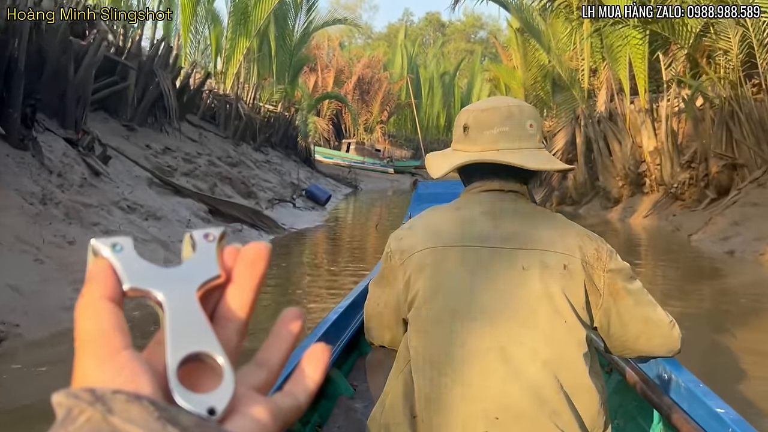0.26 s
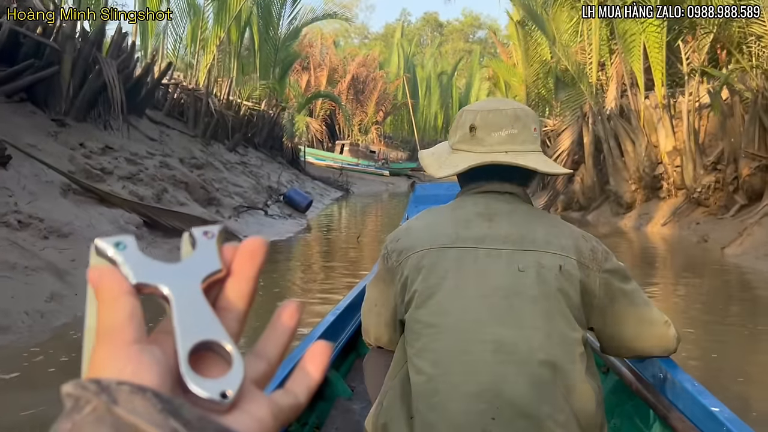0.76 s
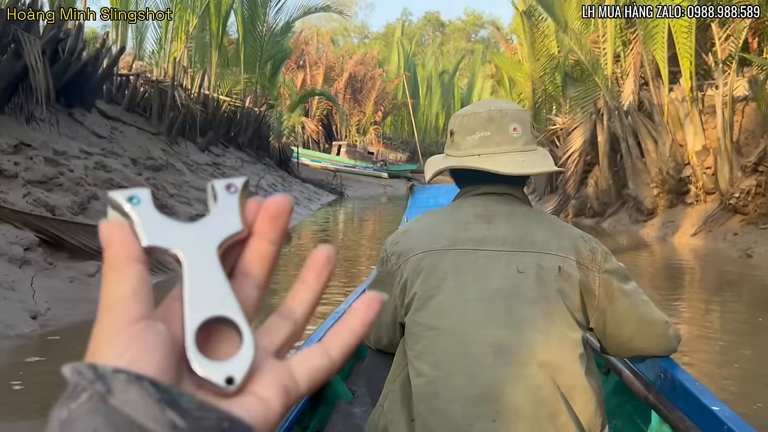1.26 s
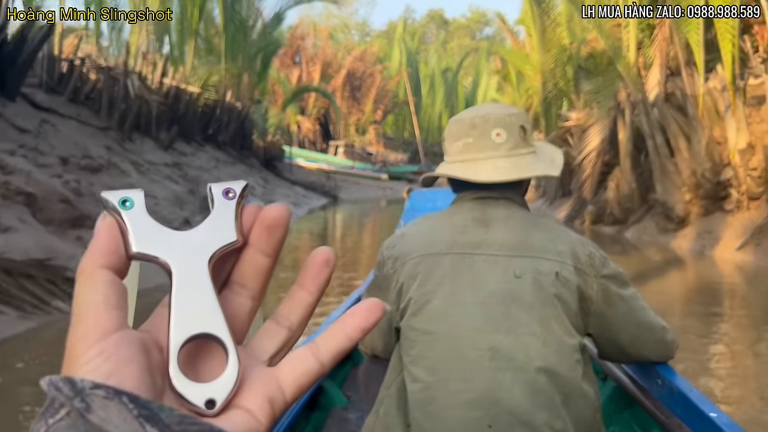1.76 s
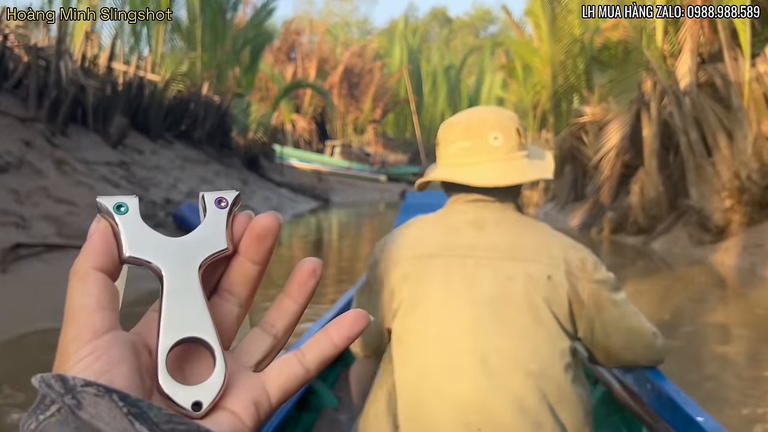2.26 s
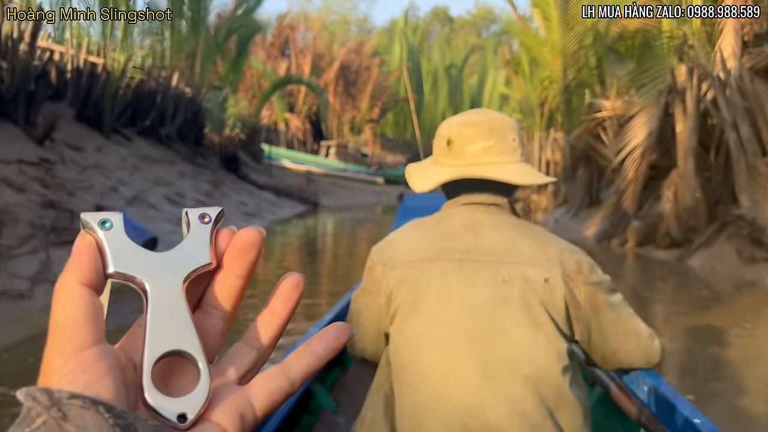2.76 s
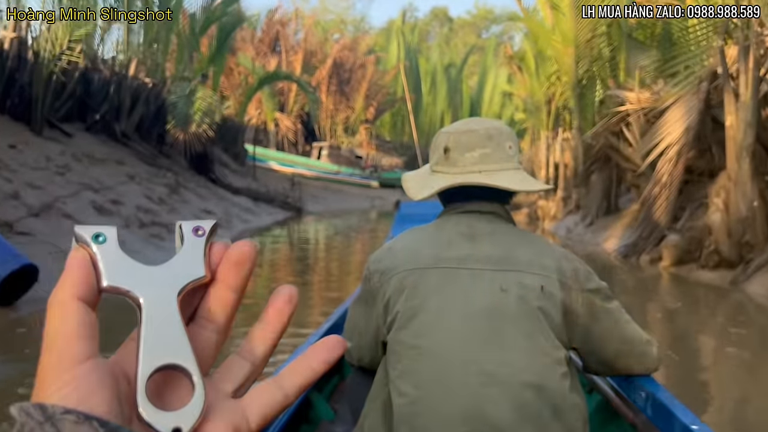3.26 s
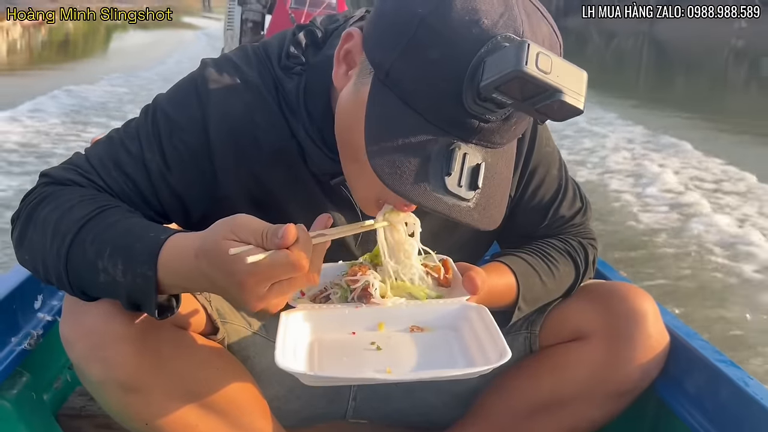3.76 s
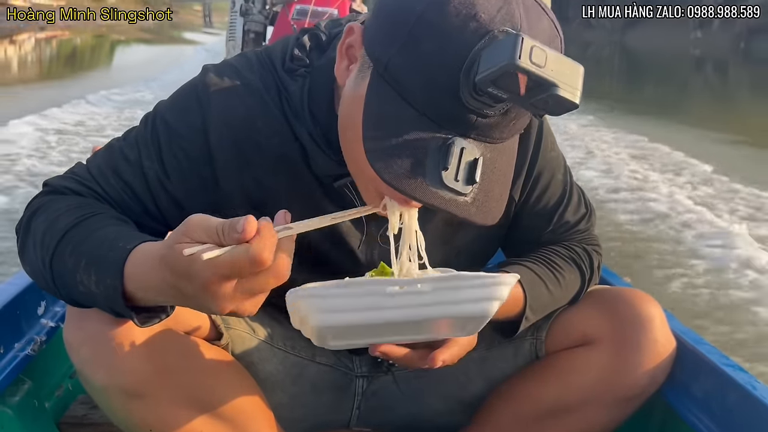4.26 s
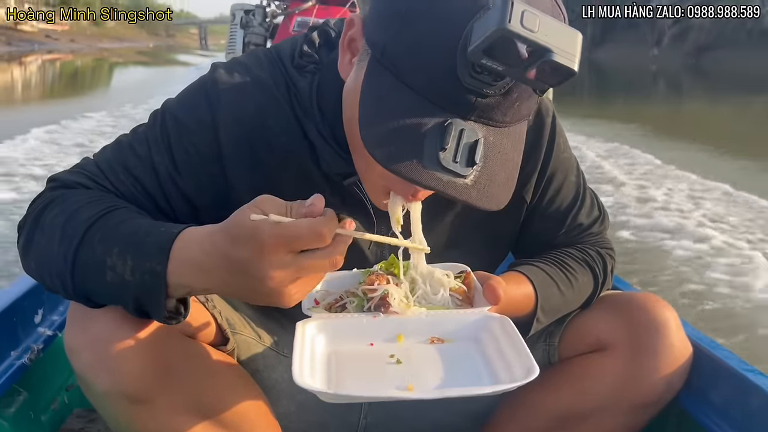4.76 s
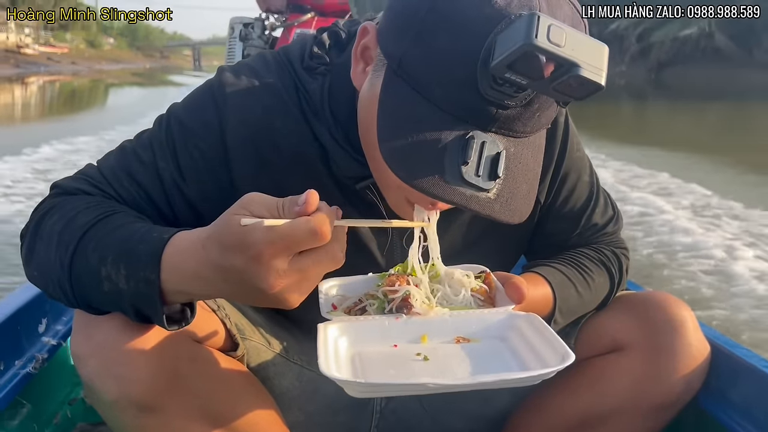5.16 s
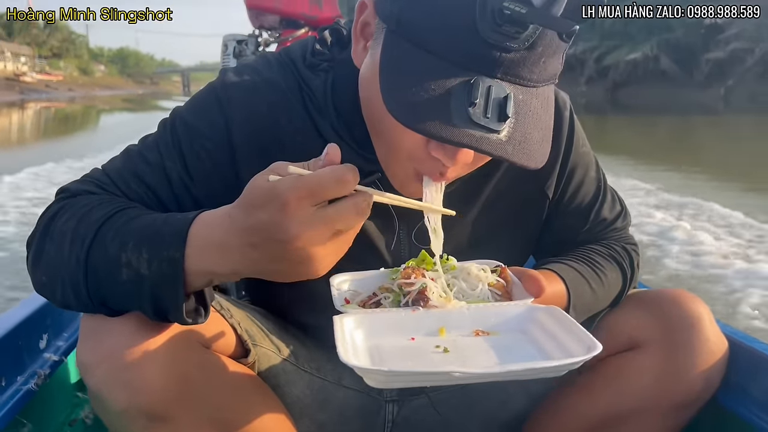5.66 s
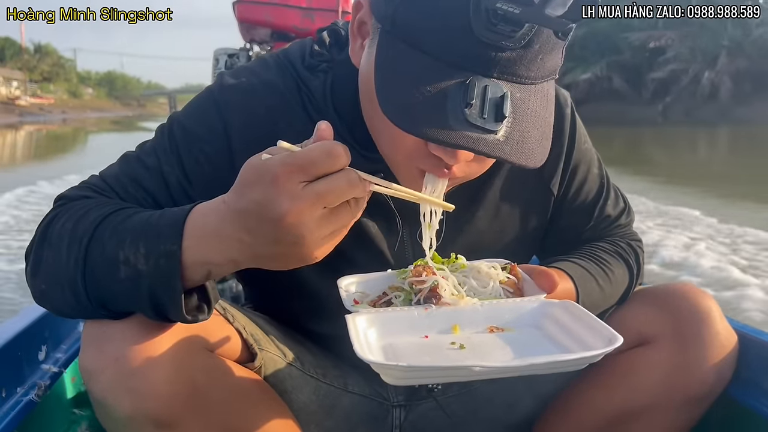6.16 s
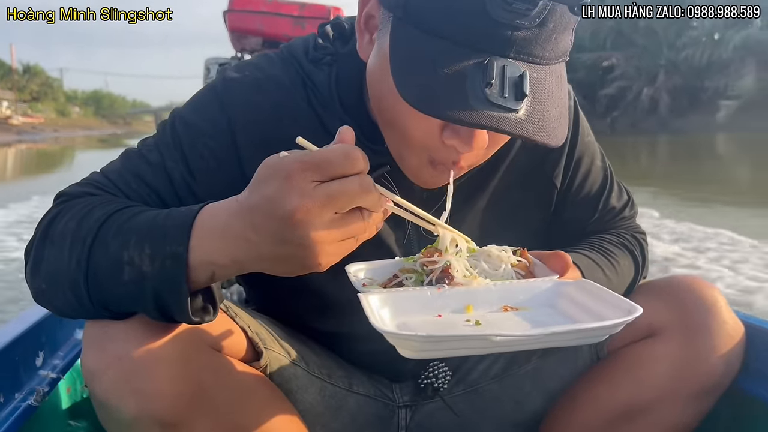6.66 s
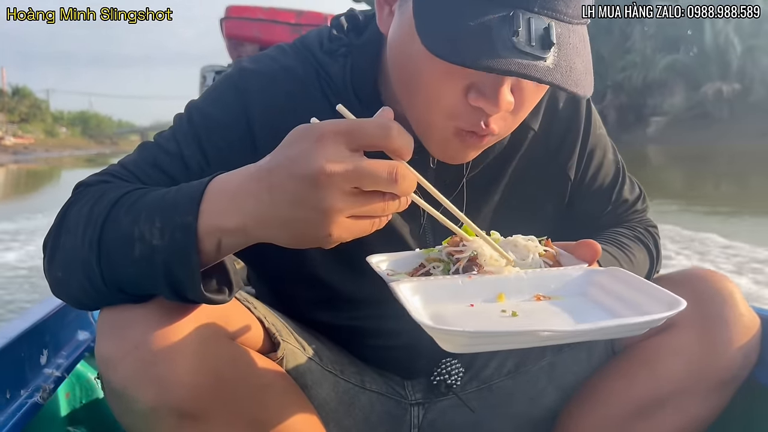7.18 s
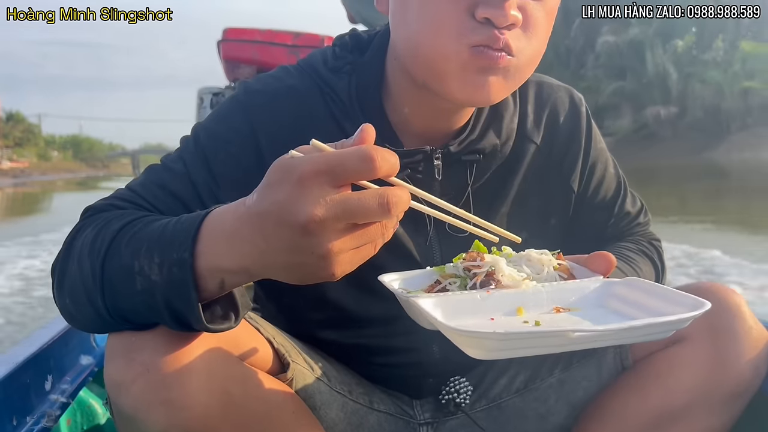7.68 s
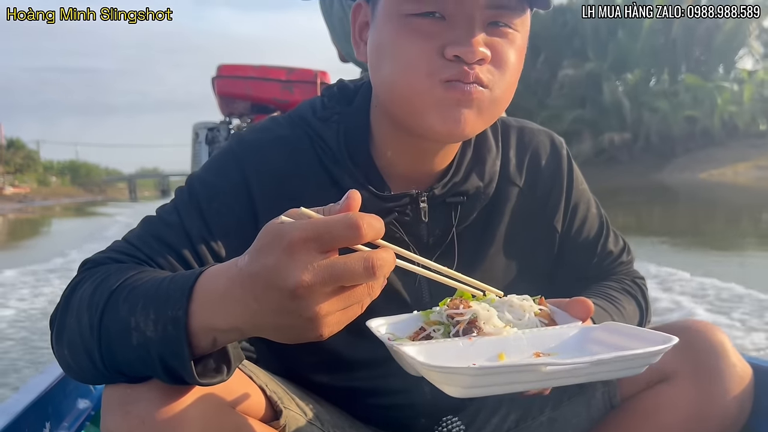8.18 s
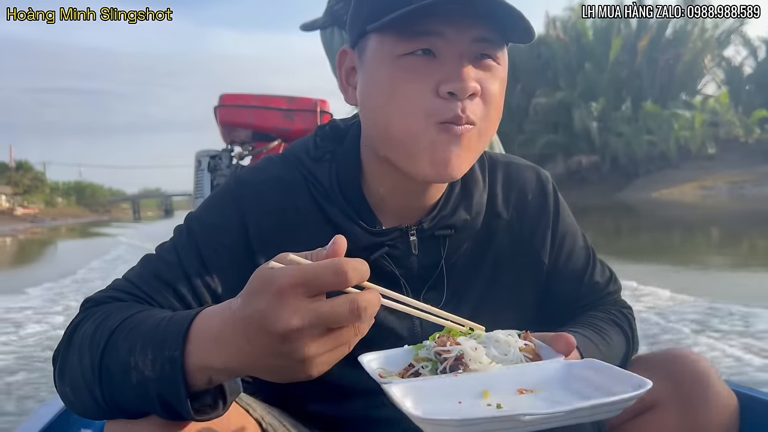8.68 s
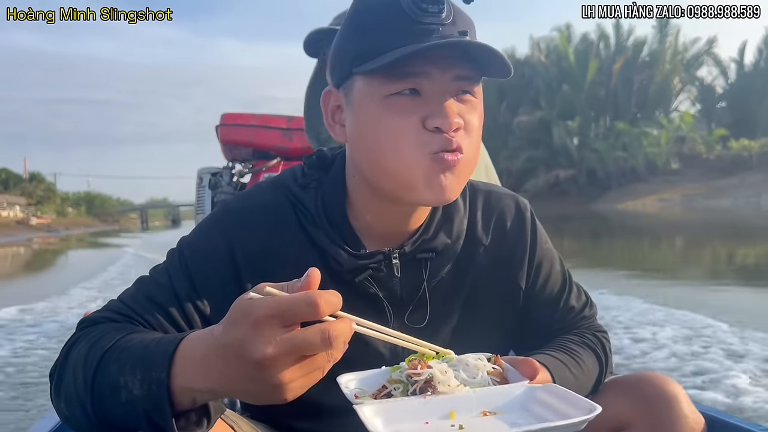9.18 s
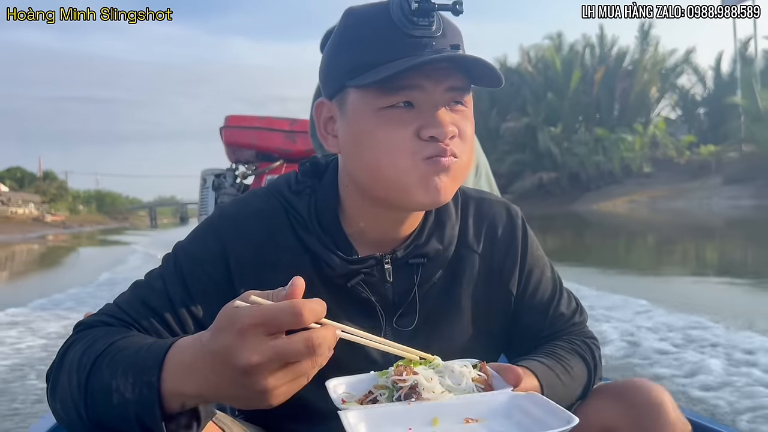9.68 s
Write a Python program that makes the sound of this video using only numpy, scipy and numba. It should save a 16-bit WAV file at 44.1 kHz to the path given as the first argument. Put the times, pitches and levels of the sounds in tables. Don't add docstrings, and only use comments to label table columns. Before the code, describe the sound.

Rapid, low motor firings blur into a throbbing drone in a narrow creek, the tone swelling and hollowing with echoes, with breathy exhaust puffs and soft hull wash. An abrupt change moves to open river: the engine is a little higher in pitch, even and buzzy, with more metallic rattle and fuller water noise. A faint brighter spray passes near the end. Close phone microphone aboard, no speech.

```python
import sys
import numpy as np
from scipy import signal
from scipy.fft import rfft, irfft, next_fast_len
from scipy.io import wavfile
from scipy.ndimage import uniform_filter1d
from numba import njit

SR = 44100
rng = np.random.default_rng(int(sys.argv[2]) if len(sys.argv) > 2 else 0)


def to_linear_factor(level_db):
    exponent = np.asarray(level_db, float) / 20
    return 10 ** exponent


def materialize(psi):
    bounded = np.clip(np.atleast_2d(psi).T, -1, 1)
    quanta = np.round(bounded * 32767).astype(np.int16)
    wavfile.write(sys.argv[1], SR, quanta)


N = 437913
CUT_S = 3.468
HOP = 128


def on_log(hz, table, column=1):
    rows = np.array(table, float)
    return np.interp(np.log(np.maximum(hz, 1)), np.log(rows[:, 0]), rows[:, column])


def columns(table, t):
    s, *rest = np.transpose(table)
    return [np.interp(t, s, c) for c in rest]


def bump(x, centre, width):
    return np.exp(-((x - centre) / width) ** 2)


def walk(rate_hz, count, frames):
    k = max(int(SR / HOP / rate_hz), 1)
    draws = rng.standard_normal((count, frames // 4 + 2))[:, :frames // k + 1]
    held = np.repeat(draws, k, axis=1)
    return 1.45 * uniform_filter1d(held, k, axis=1)[:, :frames]


def shading(hz, shade, turn):
    full_turn_db = sum(change_db * bump(np.log2(hz / centre_hz), 0, octaves)
                       for centre_hz, octaves, change_db in shade)
    return (turn - .5) * full_turn_db


def port_gains(hz, ports):
    half = np.exp(.5j * on_log(hz, ports, column=2)) * to_linear_factor(on_log(hz, ports, column=3) / 2)
    return np.array([half, 1 / half]) / np.maximum(np.abs(half + 1 / half) / 2, .5)


@njit
def stack(turns, size, ears, hop):
    out = np.zeros((2, len(turns)))
    for i in range(len(turns)):
        j, a = i // hop, (i % hop) / hop
        step = np.exp(2j * np.pi * turns[i])
        z = step
        for k in range(size.shape[0]):
            v = z * ((1 - a) * size[k, j] + a * size[k, j + 1])
            out[0, i] += (v * ears[0, k]).real
            out[1, i] += (v * ears[1, k]).real
            z *= step
    return out


def pulse_phase(shape_db, order, spread_rad, clatter_lead_cycles, clatter_smear_rad,
                boom_lag_cycles, bark_lead_cycles):
    log_gain = np.log(to_linear_factor(np.r_[shape_db[0] - 20, shape_db, shape_db[-1] - np.arange(60)]))
    cepstrum = irfft(log_gain)
    cepstrum[1:len(cepstrum) // 2] *= 2
    cepstrum[len(cepstrum) // 2 + 1:] = 0
    phase = rfft(cepstrum).imag[order] + np.pi - spread_rad * np.sqrt(order)
    smear = clatter_smear_rad * rng.standard_normal(len(order))
    phase += (order > 11) * order * (2 * np.pi * clatter_lead_cycles + smear)
    bark = (order >= 8) * (order <= 14)
    boom = order <= 3
    return phase + 2 * np.pi * order * (bark_lead_cycles * bark - boom_lag_cycles * boom)


def exhaust(t, turns, speed, control, turning, banks, orders, casing, cover, ports, shade,
            swell_db, rough, top_hz, body_db, swell_rate_hz, uneven_db, **pulse):
    s = t[0] + np.arange(len(t) // HOP + 2) * HOP / SR
    hz, turn = columns(speed, s)[0], columns(control, s)[1]
    order = np.arange(1, int(top_hz / hz.mean()) + 1)
    shape_db = on_log(order * hz.mean(), casing) + uneven_db * rng.standard_normal(len(order))
    shape_db[:len(orders)] = np.array(orders)[:, 1]
    phase = pulse_phase(shape_db, order, **pulse)

    drift = walk(swell_rate_hz, len(order), len(hz))
    drift[:9] *= .2
    db = shape_db[:, None] + np.linspace(*body_db, len(hz)) + swell_db * np.minimum(drift, drift / 2)
    line_hz = order[:, None] * hz
    for panel_hz, width_hz, lift_db in cover:
        db += lift_db / (1 + ((line_hz - panel_hz) / width_hz) ** 2)
    for at_s, half_s, echo_hz, echo_db in banks:
        db += echo_db * bump(s, at_s, half_s) * bump(line_hz, echo_hz, 14)
    db += shading(line_hz, shade, turn)
    for k, lift_db, turn_db in turning:
        db[round(k) - 1] += lift_db + turn_db * (turn - .5)

    wobble = walk(hz.mean(), 2 * len(order), len(hz))
    roughness = rough * np.sqrt(order)[:, None] * (wobble[::2] + 1j * wobble[1::2])
    phase_drift = swell_db * 0.15 * walk(swell_rate_hz, len(order), len(hz))
    size = np.sqrt(2) * to_linear_factor(db) * (1 + roughness) * np.exp(1j * (phase[:, None] + phase_drift))
    return stack(turns, size, port_gains(order * hz.mean(), ports), HOP)


def noise_bands(count, spectrum, ports, per_octave):
    size = next_fast_len(count)
    hz = np.arange(size // 2 + 1) * SR / size
    low_hz, high_hz = spectrum[0][0], spectrum[-1][0]
    both, left, right = (rfft(rng.standard_normal(size)) for _ in range(3))
    share = np.clip(on_log(hz, ports), 0, 1)
    mixed = np.sqrt(share) * both + np.sqrt(1 - share) * np.array([left, right])
    pair = port_gains(hz, ports) * mixed
    pair *= to_linear_factor(on_log(hz, spectrum)) * (hz > low_hz) * (hz < high_hz)
    pair /= np.sqrt(2 * np.sum(np.abs(pair.mean(axis=0)) ** 2)) / size
    place = per_octave * np.log2(np.maximum(hz, 1) / low_hz)
    for k in range(int(per_octave * np.log2(high_hz / low_hz)) + 2):
        band = pair * np.clip(1 - np.abs(place - k), 0, 1)
        yield low_hz * 2 ** (k / per_octave), irfft(band, size)[:, :count]


def gas(t, turns, level_db, ring_db, bright_db, hiss, ports, scatter_db, colour_db, ring_hz,
        lag_cycles, puff_db, lead_db, swell_db, shade, turn):
    frame = np.arange(len(t)) // HOP
    level_db, ring_db, bright_db = level_db[::HOP], ring_db[::HOP], bright_db[::HOP]
    cycle = turns - lag_cycles
    gate = np.exp(2.6 * (np.cos(2 * np.pi * cycle) - 1))
    intake = np.exp(7.1 * (np.cos(2 * np.pi * (cycle + 0.37)) - 1))
    floor = 1 + to_linear_factor(2 * lead_db) * intake
    firing = np.floor(cycle + .5).astype(int) + 2
    strength_db = scatter_db * rng.standard_normal(400)
    out = 0
    for hz, band in noise_bands(len(t), hiss, ports, per_octave=8.12):
        tint_db = colour_db * np.clip(rng.standard_normal(400), -3, 1.5)
        puff = to_linear_factor(2 * (puff_db * min(hz / 6000, 1) + strength_db + tint_db))
        puffs = puff[firing] * gate
        power = floor + puffs
        slow_db = level_db + swell_db * walk(3.28, 1, len(level_db))[0] + bright_db * np.log2(hz / 5000)
        ring = ring_db * np.exp(-(np.log(hz / ring_hz) * 14) ** 2)
        slow_db += 0.76 * ring + shading(hz, shade, turn[::HOP])
        rung = floor + puffs * to_linear_factor(3.0 * ring)[frame]
        out = out + band * (np.sqrt(rung / power.mean()) * to_linear_factor(slow_db)[frame])
    return out


def wash(t, turns, level_db, spectrum, ports, lag_cycles, throb_db, flicker_db, shade, turn):
    out, frame = 0, np.arange(len(t)) // HOP
    knock = np.exp(2.1 * (np.cos(2 * np.pi * (turns - lag_cycles)) - 1))
    for hz, band in noise_bands(len(t), spectrum, ports, per_octave=3.15):
        flicker = walk(2.47, 1, frame[-1] + 1)[0, frame]
        band_db = flicker_db * flicker + throb_db * min(hz / 1000, 1) * knock + shading(hz, shade, turn)
        out = out + band * to_linear_factor(band_db)
    return out * to_linear_factor(level_db)


def creek(t):
    # [t/s, firing rate/Hz]
    speed = [
        (0, 32.52),
        (.4, 32.04),
        (.8, 31.3),
        (1.3, 30.78),
        (1.6, 30.7),
        (2.1, 32.43),
        (2.7, 33.32),
        (3.47, 33.9),
    ]
    # [t/s, gas and water level/dB, throttle opening 0-1 (passed on as turn)]
    control = [(0, 2, 0), (.6, 0.5, 0), (1.1, 0.5, 0.16), (1.55, 0.5, 0.45), (1.9, 1.5, 0.6), (2.3, 1.5, 0.85),
               (2.6, 2, 0.93), (3, 1, 1), (3.47, 2.5, 0.77)]
    # [order, lift/dB, change over whole throttle opening/dB]
    turning = [(3, 0, 4.5), (5, 2, -0.5), (6, -10, 6), (9, -1, 10)]
    # [t/s, half length/s, f/Hz, level/dB]
    banks = [(0.298, 0.086, 161, 2), (.75, .12, 470, 1), (.85, .12, 101, -8), (.87, 0.099, 281, -13),
             (1.1, 0.37, 315, 6.5), (1.196, 0.085, 185, -18), (1.3, 0.22, 520, -16), (1.7, 0.16, 369, 11),
             (2.9, 0.22, 134, -14), (2.92, .12, 100, -8), (.55, 0.28, 380, -10), (2.25, .15, 396, -12),
             (.4, .4, 547, 5), (2.99, 0.055, 168, -6), (3, 0.27, 502, -12)]
    # [multiple of firing rate, level/dB]
    orders = [(1, -27), (2, 0), (3, -11), (4, -2), (5, -7), (6, -13), (7, -21), (8, -17), (9, -14),
              (10, -22), (11, -24), (12, -24), (13, -28), (14, -28), (15, -23), (16, -31), (17, -26),
              (18, -30)]
    # [f/Hz, level/dB]
    casing = [(500, -32), (700, -37), (870, -32), (1150, -35), (1300, -40), (1500, -43)]
    # [f/Hz, width/Hz, level/dB]
    cover = [
        (156.6, 1.34, -26.5),
        (184.8, 4.9, 18.5),
        (1044.5, 12.3, 10),
    ]
    # [f/Hz, level/dB per Hz]
    hiss = [(1410, 5.5), (2400, -0.5), (2980, 1), (4730, -1), (6060, 2), (7400, -9.5), (8620, -1),
            (10200, -19.5), (11400, -13), (12500, -17), (13700, -33), (14500, -25), (16200, -21)]
    # [f/Hz, level/dB per Hz]
    water = [(20, -30), (40, -21), (70, -8), (145, -11), (215, -14.5), (290, -12.5), (380, -23.5),
             (480, -20), (650, -26), (1040, -24.5), (1450, -33), (2050, -26.5), (2800, -35.5), (3600, -58)]
    # [f/Hz, shared share 0-1, left lead/rad, left minus right/dB]
    ports = [(60, .98, -.1, -.7), (200, .8, -.2, -1.8), (350, .6, -.6, -3), (500, .3, -1.6, -3.5),
             (650, .4, 2.2, -4), (900, .45, 1.8, -4), (1500, .4, 2.2, -3), (2400, .3, 1.1, -2),
             (3400, .35, .5, -2), (5500, .25, 0, 2), (7200, .3, 2, -1), (8300, .4, 0, -4),
             (9400, .6, -1.6, -2), (10300, .95, -3.14, 0), (11900, .97, -6.28, 0), (13700, .97, -9.42, 0),
             (15300, .97, -12.57, 0)]
    # [f/Hz, width/octaves, change over whole throttle opening/dB]
    shade = [(600, 0.72, 1), (2300, .3, 2.5), (8200, 0.16, 2)]

    turns = np.cumsum(columns(speed, t)[0]) / SR - .04
    near_db, turn = columns(control, t)
    pipe = exhaust(t, turns - .38, speed, control, turning, banks, orders, casing, cover, ports, shade,
                   swell_db=5, rough=.03, top_hz=1500, body_db=(-16.5, -15), swell_rate_hz=4,
                   uneven_db=-3.0, spread_rad=0.17, clatter_lead_cycles=.55, clatter_smear_rad=.12,
                   boom_lag_cycles=0, bark_lead_cycles=0)
    puffs = gas(t, turns, near_db - 29.0, 7 * turn ** 2, 4.8 + 0 * t, hiss, ports,
                scatter_db=2, colour_db=6.5, ring_hz=4300, lag_cycles=0.045, puff_db=-5.5,
                lead_db=0, swell_db=-1.15, shade=shade, turn=turn)
    return pipe + puffs + wash(t, turns, near_db - 28.0, water, ports, lag_cycles=-.2, throb_db=-1.5,
                               flicker_db=2.0, shade=shade, turn=turn)


def river(t):
    # [t/s, firing rate/Hz]
    speed = [(3.47, 36.616), (4.3, 36.54), (4.9, 36.616), (5.6, 36.579), (6.4, 36.548), (6.9, 36.583),
             (7.7, 36.351), (8.4, 36.522), (9.1, 36.473), (9.93, 36.601)]
    # [t/s, nearness of gas and water level/dB, turn 0-1]
    control = [(3.47, 0.83, 0.056), (4.4, 0.67, 0.089), (5.2, 0.52, 0.29), (6, 0.082, 0.5), (6.8, 0.7, 0.58),
               (7.5, 0.48, 0.71), (8.2, 0.56, 0.51), (8.8, 0.87, 0.57), (9.93, -0.17, 0.56)]
    # [order, lift/dB, change over whole turn/dB]
    turning = [(5, 1, 6.5), (6, 0.5, 4.5), (7, 0.5, 4.5), (9, -3.5, 11), (10, -2.5, -12.5),
               (11, -0.5, -4.5), (12, 1, 4), (14, -2, -10), (34, 14, 8), (45, 1.5, -11), (48, 7.5, -11),
               (49, -8, -4), (53, -4, 7), (57, 1, -11), (60, -9, -14)]
    # [t/s, half length/s, f/Hz, level/dB]
    banks = [
        (6.2, 0.27, 73, -3),
        (6.27, 0.27, 183, -4),
        (4.9, .4, 110, -7),
    ]
    # [multiple of firing rate, level/dB]
    orders = [(1, -19), (2, 0), (3, -9), (4, -9), (5, -4), (6, -8), (7, -5), (8, -9), (9, -18), (10, -11),
              (11, -7), (12, -16), (13, -11), (14, -15), (15, -24), (16, -16), (17, -18), (18, -14),
              (19, -16), (20, -28), (21, -21), (22, -22), (23, -29), (24, -33), (25, -30), (26, -24),
              (27, -24), (28, -20), (29, -24), (30, -23)]
    # [f/Hz, level/dB]
    casing = [(1130, -27), (1350, -37), (1650, -32), (1790, -28), (1900, -33), (2080, -29), (2400, -31),
              (2700, -39)]
    # [f/Hz, width/Hz, level/dB]
    cover = [
        (1500, 140, -5),
    ]
    # [f/Hz, level/dB per Hz]
    hiss = [(1410, -4.5), (2400, -2.5), (2930, -8), (3230, -6.5), (4170, -3), (5050, -2.5), (7110, -8),
            (8350, -0.5), (9330, -7), (10200, -22.5), (11600, -8), (13000, -18.5), (13700, -31),
            (15100, -17), (16200, -34)]
    # [f/Hz, level/dB per Hz]
    water = [(20, -21), (45, -10.5), (90, -1.5), (130, -3), (160, 5), (200, -2), (270, -4.5), (340, -7.5),
             (420, -7.5), (660, -7), (880, -16), (1040, -10), (1400, -21), (1900, -15), (2800, -38),
             (3600, -37)]
    # [f/Hz, shared share 0-1, left lead/rad, left minus right/dB]
    ports = [(60, .98, .1, -.7), (200, .85, .15, -1.8), (500, .65, .7, -.8), (750, .6, 1, 0),
             (1050, .6, .7, 4), (1400, .35, 1.8, 3), (1750, .5, -1, 2), (2500, .5, 1.4, 1.5),
             (3400, .3, 2, 1.5), (5500, .5, 0, 2), (7000, .45, .9, 1), (8300, .8, .2, .5),
             (9300, .7, -1.4, 0), (10250, .97, -3.14, 0), (11950, .98, -6.28, 0), (13700, .96, -9.42, 0),
             (15200, .97, -12.57, 0)]
    # [f/Hz, width/octaves, change over whole turn/dB]
    shade = [(940, 0.053, 6.5), (1530, 0.16, -4), (1920, 0.056, 21), (2420, 0.037, 16), (3060, 0.12, -5.5),
             (6200, 0.17, -11)]

    turns = np.cumsum(columns(speed, t)[0]) / SR - .03
    near_db, turn = columns(control, t)
    pipe = exhaust(t, turns - .17, speed, control, turning, banks, orders, casing, cover, ports, shade,
                   swell_db=1.0, rough=.022, top_hz=2680, body_db=(-21, -23.5), swell_rate_hz=1.49,
                   uneven_db=1.5, spread_rad=0.21, clatter_lead_cycles=.3, clatter_smear_rad=.021,
                   boom_lag_cycles=.08, bark_lead_cycles=.018)
    spray_db_per_octave = 3 * bump(t, 8.8, 0.15)
    puffs = gas(t, turns, near_db - 35.5, 5 * turn - .8, spray_db_per_octave, hiss, ports,
                scatter_db=.7, colour_db=2.7, ring_hz=4800 + 350 * turn[::HOP], lag_cycles=.01, puff_db=8.5,
                lead_db=-1.5, swell_db=-0.5, shade=shade, turn=turn)
    return pipe + puffs + wash(t, turns, 0.84 * near_db - 28, water, ports, lag_cycles=0.53, throb_db=-2.5,
                               flicker_db=1.3, shade=shade, turn=turn)


def scene():
    t, cut = np.arange(N) / SR, int(CUT_S * SR)
    return np.hstack([creek(t[:cut]), river(t[cut:])])


def roll_off(x):
    return signal.sosfilt(signal.butter(12, 15900, fs=SR, output="sos"), x)


def record(dry):
    rounded = np.tanh(.7 * dry) / .7
    return roll_off(rounded)


dry = scene()
out = record(dry)
materialize(out)
```